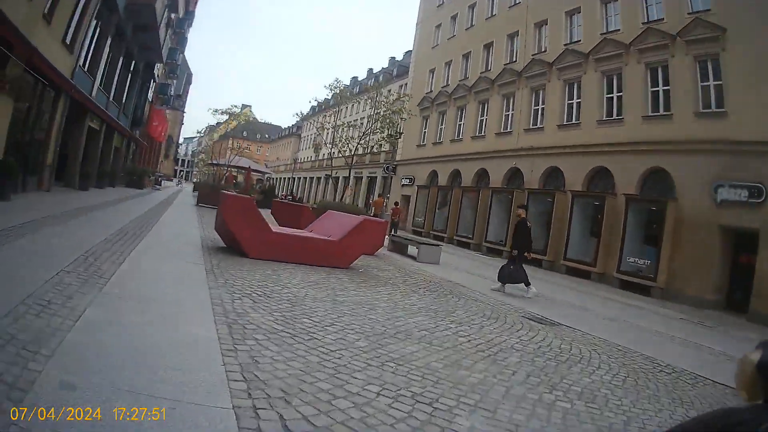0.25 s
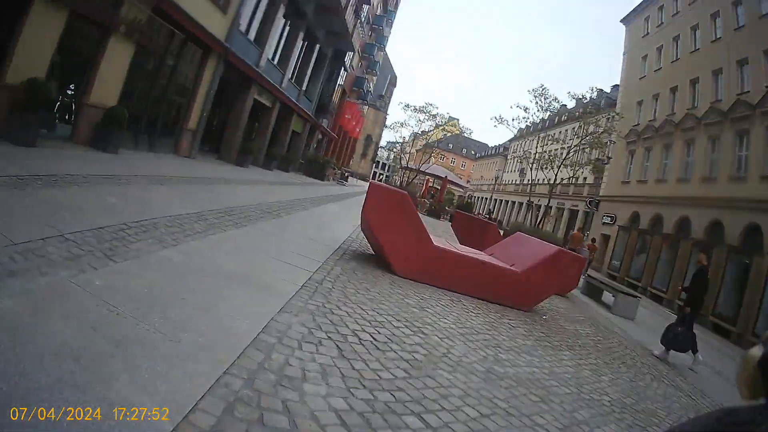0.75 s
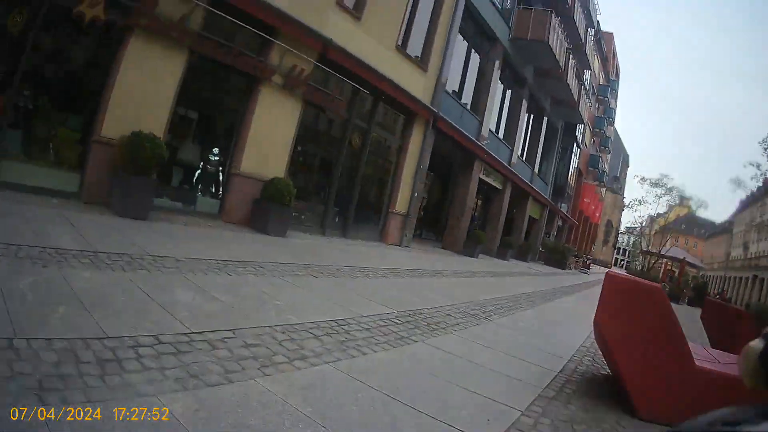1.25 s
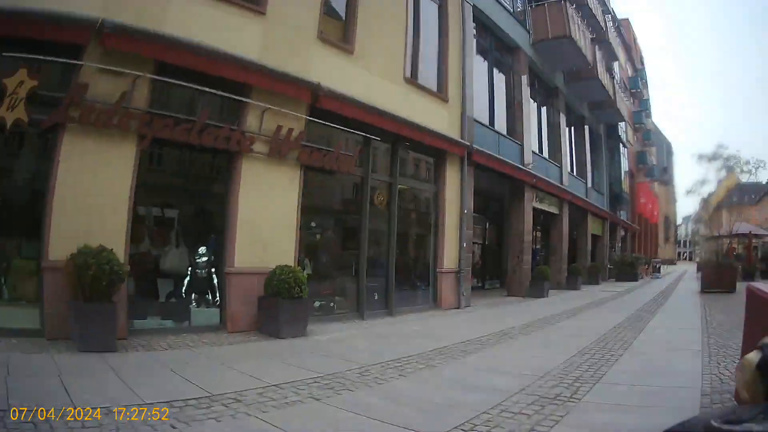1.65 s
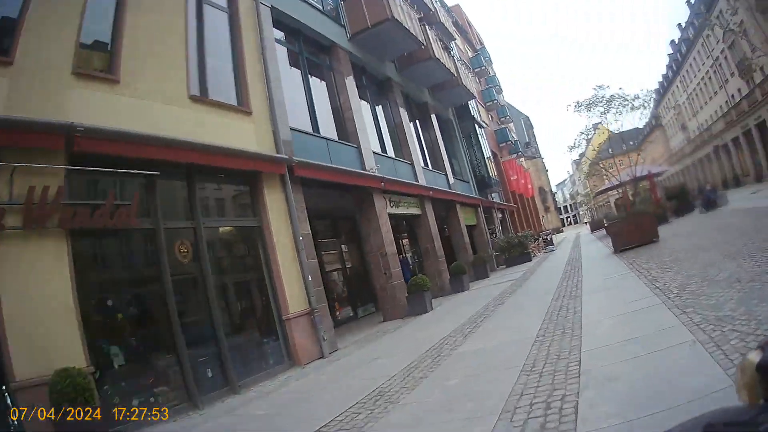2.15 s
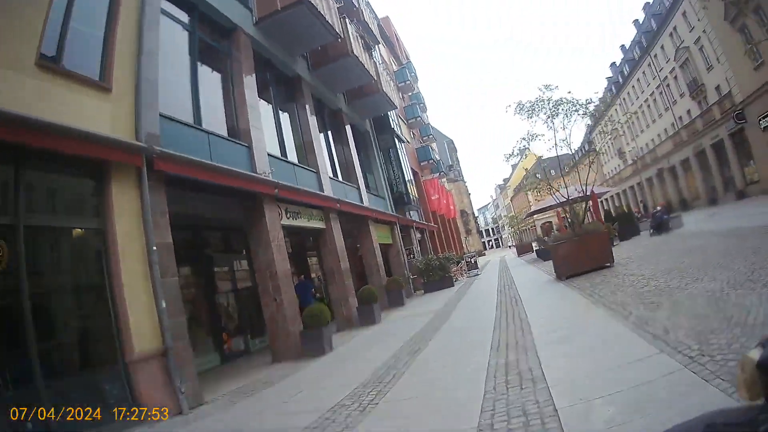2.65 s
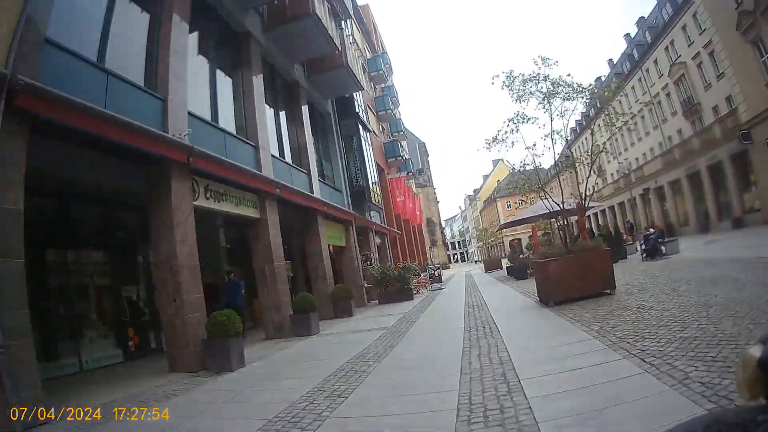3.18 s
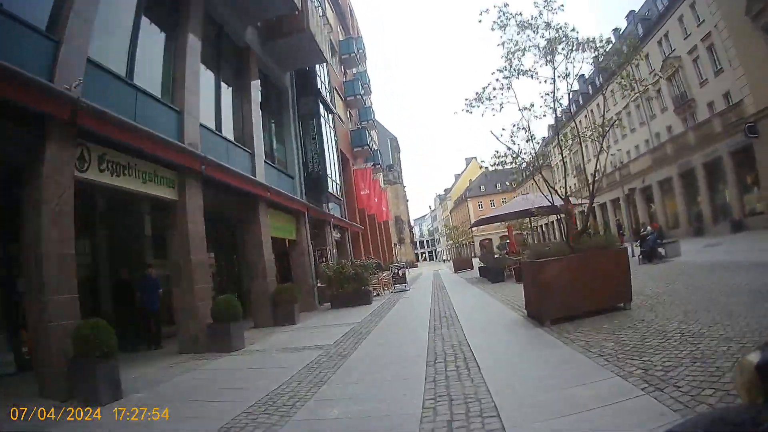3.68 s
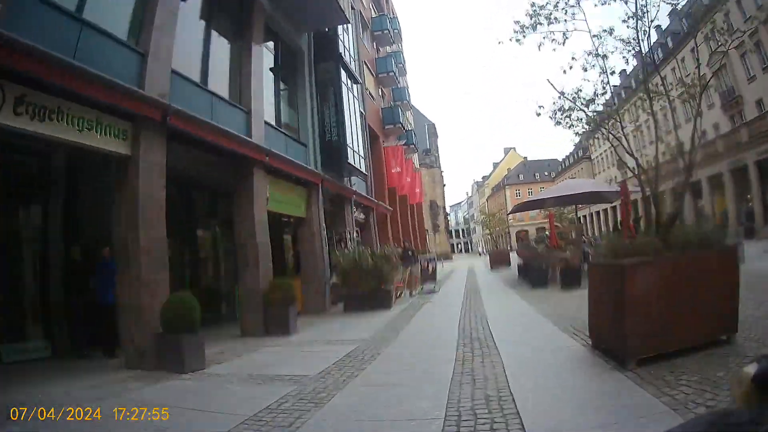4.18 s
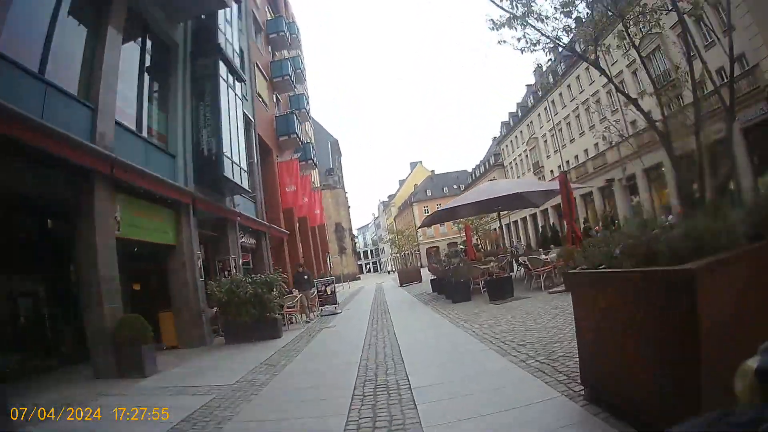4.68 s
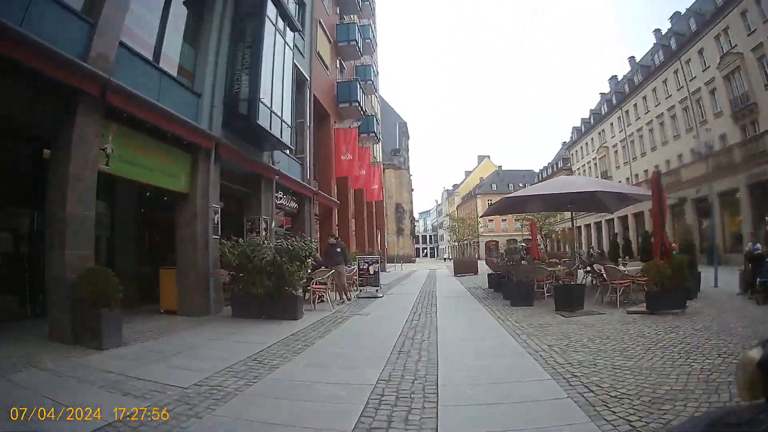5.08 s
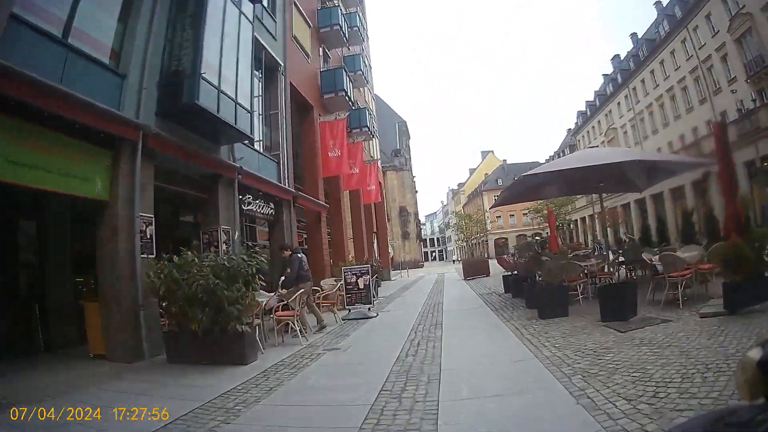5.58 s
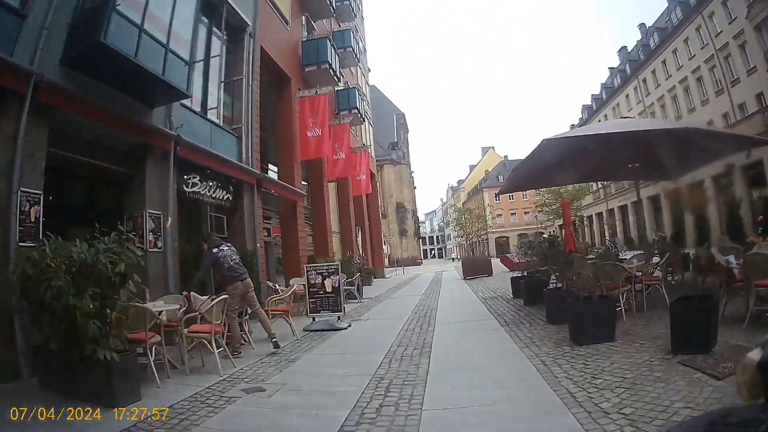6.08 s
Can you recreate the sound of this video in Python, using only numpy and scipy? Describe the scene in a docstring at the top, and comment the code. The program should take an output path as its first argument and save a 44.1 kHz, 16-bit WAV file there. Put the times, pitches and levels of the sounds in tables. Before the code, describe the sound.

Close, boomy frame rumble and rapid clattering knocks from a bike on rough paving, overloading at the worst jolts, easing to a soft rolling rumble.

```python
"""On a bicycle rolling over cobbles and slabs, a small clamped camera hears mostly through the frame.
Shaken frame, tubes and housing rumble, hum and whirr as resonant noise; the tyre's air sings faintly.
The loose mount rattles, knocks down on its seat and crunches against its upper stop: blows on decaying modes.
The microphone input overloads on the hardest jolts."""
import sys
import numpy as np
from scipy import signal
from scipy.io import wavfile

SR = 44100
rng = np.random.default_rng(int(sys.argv[2]) if len(sys.argv) > 2 else 0)


def waveform_to_disk(signal):
    """Save audio, clipped to [-1, 1], as 16-bit WAV at the path in sys.argv[1]."""
    frames = np.transpose(np.atleast_2d(signal))
    scaled = np.clip(frames, -1, 1) * 32767
    samples = np.round(scaled).astype(np.int16)
    wavfile.write(sys.argv[1], SR, samples)


N = 279594


def amp(db):
    """Decibels to amplitude."""
    return 10 ** (np.asarray(db) / 20)


def rms_one(x):
    """Scale to rms 1."""
    return x / np.sqrt(np.mean(x ** 2) + 1e-20)


def in_time(rows):
    """Straight lines between (s, value) rows, one value per sample."""
    s, values = np.transpose(rows)
    return np.interp(np.arange(N) / SR, s, values)


def dull(x, hz):
    """Second-order low-pass."""
    return signal.sosfilt(signal.butter(2, hz, fs=SR, output="sos"), x)


def soft_limit(x, limit, knee):
    """Round off both signs towards the limit; a higher knee bends more sharply."""
    return x / (1 + np.abs(x / limit) ** knee) ** (1 / knee)


def drift(rate_hz):
    """Slow chance with spread 1: noise through a double pole."""
    r = np.exp(-2 * np.pi * rate_hz / SR)
    slow = signal.lfilter([1], [1, -2 * r, r * r], rng.standard_normal(N + SR))
    return rms_one(slow[SR:])


def resonant_noise(peaks, lumpy_db):
    """Noise twice through each resonance, each swelling on its own; rms 1."""
    settle = 8192
    out = 0
    for hz, width_hz, level_db in peaks:
        r = np.exp(-np.pi * 1.55 * width_hz / SR)   # two passes narrow it back to width_hz
        b, a = [1, 0, -1], [1, -2 * r * np.cos(2 * np.pi * hz / SR), r * r]
        once = signal.lfilter(b, a, rng.standard_normal(N + settle))
        band = signal.lfilter(b, a, once)[settle:]
        out = out + rms_one(band) * amp(level_db + lumpy_db * drift(18.9))
    return rms_one(out)


# Slow frame and fork modes. Each row: frequency in Hz, width in Hz, relative level in dB.
SWAY_MODES = [(34.75, 18.8, -1), (54.1, 17.7, -0.5), (98.85, 22.5, -6), (133, 51, -10.5)]


def frame_sway(level_db):
    """The paving shakes the slow frame and fork modes into a low rumble."""
    return amp(level_db) * resonant_noise(SWAY_MODES, lumpy_db=2.5)


# Shaken tubes. Each row: frequency in Hz, width in Hz, relative level in dB.
HUM_MODES = [(208, 42, -1.5), (297.6, 68, -1), (350.2, 19, -4), (429.7, 31, -4)]


def tube_hum(level_db):
    """The shaken tubes hum at their own resonances."""
    return amp(level_db) * dull(resonant_noise(HUM_MODES, lumpy_db=2.5), 470.0)


# Shaken housing. Each row: frequency in Hz, width in Hz, relative level in dB.
WHIRR_MODES = [(860, 300, 7), (1324, 170, 13), (1630, 170, -3), (2000, 96, -6.5), (2320, 81, -11)]


def housing_whirr(level_db):
    """The shaken camera housing whirrs at its higher resonances."""
    whirr = resonant_noise(WHIRR_MODES, lumpy_db=4.0)
    return amp(level_db) * dull(dull(whirr, 3900.0), 3600.0)


# Air resonance in the tyre. Each row: frequency in Hz, width in Hz, relative level in dB.
TYRE_MODES = [(298.4, 25, 0)]
# Loudness of the tyre's air. Each row: time in seconds, level in dB.
TYRE_LEVEL = [(0, -33), (4.8, -36), (5.15, -28), (5.4, -34), (5.6, -32.5), (5.85, -32.5), (5.95, -20),
              (6.05, -32.5), (6.34, -30.5)]


def tyre_song():
    """The air in the tyre sings faintly in one narrow resonance."""
    return amp(in_time(TYRE_LEVEL)) * resonant_noise(TYRE_MODES, lumpy_db=2.5)


def ring(x, hz, t60_s):
    """One mode: a unit click sets a sine of height about 1 ringing."""
    r, w = amp(-60 / (t60_s * SR)), 2 * np.pi * hz / SR
    return signal.lfilter([0, np.sin(w)], [1, -2 * r * np.cos(w), r * r], x)


def blows(at, gains):
    """A click train."""
    clicks = np.full(N, 1e-18)
    np.add.at(clicks, at, gains)
    return clicks


def strike(modes, at, level_db, vary_db):
    """Each blow excites every mode with a strength of its own."""
    chance = rng.standard_normal((len(at), len(modes)))
    out = 0
    for k, (hz, mode_db, t60_s) in enumerate(modes):
        clicks = blows(at, amp(level_db + mode_db + vary_db * chance[:, k]))
        out = out + ring(clicks, hz, t60_s)
    return out


TIP_HZ = 3720
# Housing modes under a blow. Each row: frequency in Hz, level in dB before the tip's low-pass, t60 in s.
HOUSING_MODES = [(896, 2.5, 0.011), (1190, 4.5, 0.0015), (1343, -4.5, 0.044), (1570, -8.5, 0.0085),
                 (1880, -10, 0.017), (2288, -18, 0.029), (3320, -4.5, 0.0062), (3680, -12, 0.0022),
                 (4320, -10, 0.0029)]


def tick(at, level_db):
    """A rounded tip, two low-passes, sets the housing ringing briefly."""
    return dull(dull(strike(HOUSING_MODES, at, level_db, vary_db=2.0), TIP_HZ), TIP_HZ)


RATTLE_PER_S, RATTLE_SPREAD_DB = 130, 5.5   # rate before clumping


def rattle(level_db):
    """Loose play in the clamp: uneven small, soft ticks in clumps."""
    chance_per_sample = RATTLE_PER_S * amp(3.0 * drift(25)) / SR
    at = np.flatnonzero(rng.random(N) < chance_per_sample)
    sizes_db = RATTLE_SPREAD_DB * np.minimum(rng.exponential(1, len(at)), 4)
    return tick(at, level_db[at] + sizes_db)


SQUASH_HZ, CONTACT_HZ = 121.6, 490
SQUASH_SKEW = 0.85   # under 1: quick push, slower spring back
# Frame and tube modes under a blow. Each row: frequency in Hz, level in dB before the low-pass, t60 in s.
TUBE_MODES = [(55, -11.5, 0.078), (107.7, -17, 0.2), (284.2, -17.5, 0.071), (372.7, -17.5, 0.1),
              (660, -31.5, 0.012)]


def thud(at, level_db):
    """The rubber pad squashes and springs back once; the tubes ring on."""
    phase = np.linspace(0, 1, int(SR / SQUASH_HZ)) ** SQUASH_SKEW
    squash = signal.fftconvolve(blows(at, amp(level_db)), np.sin(2 * np.pi * phase))[:N]
    return dull(squash + strike(TUBE_MODES, at, level_db, vary_db=5.0), CONTACT_HZ)


CRUNCH_PER_S, CRUNCH_RISE_HZ = 2500, 260
CRACK_T60_S, CRACK_BAND_HZ = 0.038, [400, 1370]
CLATTER_DB = -35.5   # gain of the housing's ringing within the crunch


def crunch(at, level_db, clatter_t60_s):
    """A burst of tiny uneven contacts: a crack, and a clatter in the housing."""
    def fade(t60_s):
        decay = signal.lfilter([1], [1, -amp(-60 / (t60_s * SR))], blows(at, amp(level_db)))
        return dull(decay, CRUNCH_RISE_HZ)

    grains = rms_one((rng.random(N) < CRUNCH_PER_S / SR) * rng.standard_normal(N))
    band = signal.butter(2, CRACK_BAND_HZ, "band", fs=SR, output="sos")
    crack = rms_one(signal.sosfilt(band, grains))
    contacts = fade(clatter_t60_s) * grains
    clatter = sum(amp(mode_db) * ring(contacts, hz, t60_s) for hz, mode_db, t60_s in HOUSING_MODES)
    return fade(min(CRACK_T60_S, clatter_t60_s)) * crack + amp(CLATTER_DB) * dull(clatter, TIP_HZ)


TICK_REF_DB = -31
THUD_DB, THUD_SLOPE, THUD_TOP_DB = -5, 0.59, -3.5   # at reference tick; dB per dB of tick; ceiling
PING_DB, PING_SLOPE = -45, 0.6   # at reference tick; dB per dB of tick
KNOCK_CRUNCH_DB, KNOCK_CRUNCH_SLOPE = 37, 2.038   # at 0 dB tick, before the ceiling; dB per dB of tick
LANDING_CLATTER_T60_S, LANDING_DULL_HZ = 0.049, 5000
# Small metal part. Each row: frequency in Hz, level in dB before the tip's low-pass, t60 in s.
PING_MODES = [(3240, 1.5, .011), (3580, -9, .007)]
# The mount lands on its seat. Each row: start in seconds, tick level in dB.
KNOCKS = [(0.005, -26.5), (0.027, -36), (0.033, -28.5), (0.047, -43.5), (0.067, -32.5), (0.078, -36),
          (0.089, -39.5), (0.101, -31), (0.14, -34), (0.156, -38.5), (0.168, -36.5), (0.195, -55),
          (0.216, -34.5), (0.237, -49.5), (0.248, -49.5), (0.275, -34.5), (0.285, -45.5), (0.311, -30.5),
          (0.333, -31.5), (0.384, -33), (0.397, -46), (0.417, -43), (0.438, -55.5), (0.449, -34),
          (0.46, -50.5), (0.474, -39), (0.515, -33.5), (0.522, -53.5), (0.536, -28), (0.648, -32),
          (0.678, -48.5), (0.691, -50), (0.73, -36), (0.74, -45), (0.754, -48.5), (0.772, -37.5),
          (0.806, -31), (0.827, -28), (0.859, -24), (0.881, -49), (0.897, -26.5), (0.932, -44.5),
          (0.946, -34.5), (0.987, -36.5), (1.018, -31.5), (1.047, -31.5), (1.068, -41.5), (1.08, -42.5),
          (1.09, -37.5), (1.107, -44.5), (1.124, -39), (1.144, -46), (1.161, -37.5), (1.21, -40.5),
          (1.222, -31.5), (1.235, -36.5), (1.251, -38.5), (1.271, -34), (1.287, -35.5), (1.312, -29),
          (1.333, -33), (1.346, -45.5), (1.365, -37.5), (1.396, -42.5), (1.423, -36.5), (1.431, -46.5),
          (1.443, -52.5), (1.457, -34.5), (1.469, -59.5), (1.498, -38), (1.52, -26.5), (1.531, -50),
          (1.56, -43.5), (1.611, -40), (1.639, -44.5), (1.652, -34.5), (1.677, -17.5), (1.693, -29.5),
          (1.705, -34.5), (1.716, -42.5), (1.733, -39), (1.8, -44.5), (1.863, -29), (1.891, -30.5),
          (1.913, -34.5), (1.933, -32), (1.955, -37), (1.983, -36), (2.003, -47.5), (2.023, -51.5),
          (2.034, -35.5), (2.067, -37), (2.088, -47), (2.115, -59), (2.202, -35.5), (2.216, -50),
          (2.228, -59.5), (2.25, -33), (2.261, -53.5), (2.282, -45), (2.314, -47.5), (2.345, -51),
          (2.356, -29), (2.375, -41), (2.391, -42), (2.411, -34.5), (2.443, -45), (2.456, -37),
          (2.466, -34), (2.49, -53), (2.509, -44), (2.528, -53), (2.539, -34.0), (2.554, -35),
          (2.581, -36.5), (2.595, -39.5), (2.605, -37.5), (2.621, -54.5), (2.63, -40), (2.643, -47.5),
          (2.656, -35), (2.681, -33.5), (2.72, -33.5), (2.743, -36.5), (2.759, -44), (2.777, -33),
          (2.8, -30.5), (2.809, -37), (2.823, -48), (2.84, -36), (2.862, -48.5), (2.874, -37.5),
          (2.889, -35.5), (2.899, -30), (2.907, -28.5), (2.928, -39.5), (2.936, -51), (2.947, -37.5),
          (2.961, -33.5), (2.969, -38), (3.012, -48.5), (3.026, -52), (3.045, -38), (3.058, -31.5),
          (3.092, -32), (3.105, -31), (3.121, -23), (3.135, -32.5), (3.145, -48), (3.159, -38), (3.21, -33),
          (3.223, -48.5), (3.247, -32), (3.262, -49), (3.299, -21), (3.352, -37), (3.373, -24.5),
          (3.383, -44.5), (3.409, -46.5), (3.419, -53), (3.432, -38.5), (3.452, -29.5), (3.466, -24),
          (3.488, -46), (3.518, -31.5), (3.553, -28.5), (3.606, -31), (3.63, -51.5), (3.645, -33.5),
          (3.655, -53), (3.666, -42), (3.688, -25), (3.71, -17.5), (3.719, -37), (3.759, -33),
          (3.798, -46.5), (3.811, -45), (3.818, -32.5), (3.838, -45.5), (3.847, -48), (3.857, -35),
          (3.903, -33), (3.915, -31.5), (3.941, -41), (3.954, -17), (3.977, -24), (3.985, -30),
          (4.01, -19.5), (4.016, -12), (4.04, -31), (4.049, -38), (4.059, -32.5), (4.099, -15.5),
          (4.108, -28), (4.137, -25.5), (4.142, -34), (4.168, -35.5), (4.191, -40.5), (4.206, -52),
          (4.265, -32.5), (4.306, -47), (4.341, -46.5), (4.372, -27.5), (4.38, -33), (4.409, -24.5),
          (4.445, -33), (4.453, -49), (4.468, -34.5), (4.49, -37.5), (4.525, -35.5), (4.539, -31.0),
          (4.551, -43), (4.593, -40.5), (4.622, -38.5), (4.642, -47), (4.676, -33.5), (4.703, -32.5),
          (4.713, -40), (4.727, -45), (4.749, -27), (4.767, -30.5), (4.798, -48.5), (4.832, -40.5),
          (4.842, -30.5), (4.866, -41.5), (4.893, -34), (4.916, -39), (4.935, -45), (4.953, -46.5),
          (4.968, -47.5), (4.993, -40.5), (5.029, -57.5), (5.094, -56.5), (5.106, -35), (5.147, -34),
          (5.183, -44.5), (5.216, -40), (5.232, -56.5), (5.254, -55.5), (5.27, -54), (5.285, -51.5),
          (5.299, -57.5), (5.331, -32), (5.363, -44), (5.377, -48), (5.406, -41.5), (5.416, -58),
          (5.437, -55.5), (5.46, -44), (5.48, -47), (5.506, -41.5), (5.517, -57), (5.53, -39.5),
          (5.545, -33.5), (5.581, -43.5), (5.599, -49), (5.629, -42.5), (5.646, -50.5), (5.667, -52),
          (5.693, -53.5), (5.714, -54), (5.78, -32), (5.793, -42), (5.809, -39.5), (5.824, -57.5),
          (5.854, -41.5), (5.892, -51.5), (5.909, -57.5), (5.928, -49), (5.973, -55.5), (6.002, -37),
          (6.052, -38), (6.07, -58), (6.081, -36.5), (6.12, -38), (6.142, -45), (6.167, -50),
          (6.198, -33.5), (6.211, -41.0), (6.232, -43.5), (6.279, -41), (6.313, -35.5)]


def knocks():
    """Landings push the microphone one way, tick and ping; hard ones crunch more; gives (push, bright)."""
    s, tick_db = np.transpose(KNOCKS)
    at = (s * SR).astype(int)
    over_ref_db = tick_db - TICK_REF_DB
    push = thud(at, np.minimum(THUD_DB + THUD_SLOPE * over_ref_db, THUD_TOP_DB))
    ping = strike(PING_MODES, at, PING_DB + PING_SLOPE * over_ref_db, vary_db=1.0)
    ping = dull(dull(ping, TIP_HZ), TIP_HZ)
    crunch_db = np.minimum(KNOCK_CRUNCH_DB + KNOCK_CRUNCH_SLOPE * tick_db, tick_db + 2.0)
    crunches = dull(crunch(at, crunch_db, LANDING_CLATTER_T60_S), LANDING_DULL_HZ)
    return np.array([push, tick(at, tick_db) + ping + crunches])


REBOUND_THUD_DB, REBOUND_THUD_SLOPE = 2, 0.34   # at 0 dB crunch; dB per dB of crunch
REBOUND_TICK_DB, REBOUND_CLATTER_T60_S = -21, 0.066   # tick relative to crunch
# The mount hits its upper stop. Each row: start in seconds, crunch level in dB.
REBOUNDS = [(0.058, -30.5), (0.112, -23.5), (0.13, -29), (0.267, -27.5), (0.3, -37), (0.322, -28),
            (0.507, -33.5), (0.545, -34), (0.553, -18), (0.572, -15.5), (0.587, -21), (0.603, -30.5),
            (0.632, -30), (0.642, -30), (0.796, -27), (0.813, -21), (0.836, -13.5), (0.85, -19),
            (0.89, -21.5), (0.914, -23.5), (0.924, -30), (0.956, -28.5), (1.008, -32), (1.057, -26.5),
            (1.13, -28), (1.174, -24.5), (1.187, -23.5), (1.196, -26), (1.301, -30), (1.377, -30.5),
            (1.406, -27), (1.412, -24), (1.509, -34), (1.588, -34.5), (1.619, -20.5), (1.662, -15.5),
            (1.876, -24), (1.924, -24), (1.942, -33), (2.697, -20.5), (2.706, -34.5), (2.786, -20),
            (2.848, -33), (3.067, -19.5), (3.075, -40), (3.175, -25), (3.184, -24.5), (3.198, -23.5),
            (3.278, -28.5), (3.287, -23), (3.312, -22), (3.326, -6.5), (3.341, -15.5), (3.46, -34),
            (3.478, -15.5), (3.509, -26), (3.523, -21.5), (3.56, -33), (3.747, -24), (3.826, -22.5),
            (3.869, -26.5), (3.889, -23.5), (3.925, -29), (3.949, -20.5), (3.963, -25), (4, -18),
            (4.069, -23.5), (4.087, -24), (4.177, -23.5), (4.215, -25.5), (4.226, -14.5), (4.24, -19.5),
            (4.285, -28), (4.323, -15), (4.393, -18.5), (4.424, -22.5), (4.43, -32), (4.5, -26.5),
            (4.57, -18), (4.579, -28), (4.657, -26), (4.778, -31), (4.903, -35), (5.989, -29.5)]


def rebounds():
    """The harder upper stop pushes the microphone the other way; gives (push, bright)."""
    s, crunch_db = np.transpose(REBOUNDS)
    at = (s * SR).astype(int)
    push = -thud(at, REBOUND_THUD_DB + REBOUND_THUD_SLOPE * crunch_db)
    bright = crunch(at, crunch_db, REBOUND_CLATTER_T60_S) + tick(at, crunch_db + REBOUND_TICK_DB)
    return np.array([push, bright])


def shaking_db(events, half_s, ref_db):
    """Extra shaking for a moment around each blow, as a hump in dB."""
    s, level_db = np.transpose(events)
    hump = np.hanning(int(2 * half_s * SR))
    clicks = blows((s * SR).astype(int), amp(level_db - ref_db))
    return 20 * np.log10(1 + np.abs(signal.fftconvolve(clicks, hump, "same")))


TRAVEL, TRAVEL_KNEE, TRAVEL_HZ = 0.75, 5.6, 900


def mount_travel(swing):
    """The mount's limited play rounds off wide swings."""
    return dull(soft_limit(swing, TRAVEL, TRAVEL_KNEE), TRAVEL_HZ)


PAVING_REF_DB = -14
STONE_S, STONE_REF_DB = 0.027, -33   # half-width of a jolt; rebound reference
BUSY_S, BUSY_REF_DB = 0.02, -39.5   # half-width around a knock; knock reference
# Levels at reference roughness, before jolts and knocks; slopes in dB per dB of roughness.
HUM_DB, HUM_SLOPE = -26.5, 0.55
WHIRR_DB, WHIRR_SLOPE = -48, 0.68
RATTLE_DB, RATTLE_SLOPE = -62, 2
# dB per dB of jolt, and of knock shaking.
SWAY_JOLT, HUM_JOLT, RATTLE_JOLT = 0.35, 0.58, 1
SWAY_BUSY, HUM_BUSY, WHIRR_BUSY = 0.5, 0.33, 0.21
START_S = 0.003   # fade-in
# Roughness of the paving. Each row: time in seconds, frame sway in dB before jolts and knocks.
PAVING = [(0.0, -14), (0.32, -15.5), (0.81, -11.5), (1.04, -12.5), (1.64, -14), (2.06, -22), (2.26, -16),
          (2.75, -13.5), (3.28, -9.5), (3.6, -13.5), (3.92, -9), (4.63, -11), (4.75, -12), (4.87, -18.5),
          (5.2, -16.5), (5.5, -16.5), (5.7, -19), (5.9, -19.5), (6.34, -19)]


def scene():
    """Rougher paving raises sway, hum, whirr and rattle together; blows add brief shaking."""
    paving_db = in_time(PAVING)
    rough_db = paving_db - PAVING_REF_DB
    jolt_db = shaking_db(REBOUNDS, STONE_S, STONE_REF_DB)
    busy_db = shaking_db(KNOCKS, BUSY_S, BUSY_REF_DB)
    busy_db = busy_db - busy_db.mean()   # calmer between knocks
    sway = frame_sway(paving_db + SWAY_JOLT * jolt_db + SWAY_BUSY * busy_db)
    hum = tube_hum(HUM_DB + HUM_SLOPE * rough_db + HUM_JOLT * jolt_db + HUM_BUSY * busy_db)
    whirr = housing_whirr(WHIRR_DB + WHIRR_SLOPE * rough_db + WHIRR_BUSY * busy_db)
    tyre = tyre_song()
    loose = rattle(RATTLE_DB + RATTLE_SLOPE * rough_db + RATTLE_JOLT * jolt_db)
    push, bright = knocks() + rebounds()
    mix = mount_travel(sway + push) + bright + hum + tyre + whirr + loose
    fade_in = np.minimum(np.arange(N) / SR / START_S, 1)
    return (mix * fade_in)[None]


LEAK_SHARE, LEAK_HZ = 0.53, 695
OVERLOAD, OVERLOAD_KNEE, COUPLING_HZ = 0.695, 24, 7
FULL_SCALE, INPUT_HZ, HISS_DB, CUTOFF_HZ = 0.71, 14200, -110, 15800


def record(dry):
    """The input overloads, a coupling capacitor tilts the flat tops, the converter stops at full scale."""
    # part of the treble bypasses the limit and rides on the flat tops
    leak_filter = signal.butter(2, LEAK_HZ, "high", fs=SR, output="sos")
    leak = LEAK_SHARE * signal.sosfilt(leak_filter, dry)
    clipped = soft_limit(dry - leak, OVERLOAD, OVERLOAD_KNEE) + leak
    tilted = signal.sosfilt(signal.butter(1, COUPLING_HZ, "high", fs=SR, output="sos"), clipped)
    stopped = dull(np.clip(tilted, -FULL_SCALE, FULL_SCALE), INPUT_HZ)
    noisy = stopped + amp(HISS_DB) * rng.standard_normal(dry.shape)
    return signal.sosfilt(signal.cheby2(12, 70, CUTOFF_HZ, fs=SR, output="sos"), noisy)


dry = scene()
out = record(dry)
waveform_to_disk(out)
```